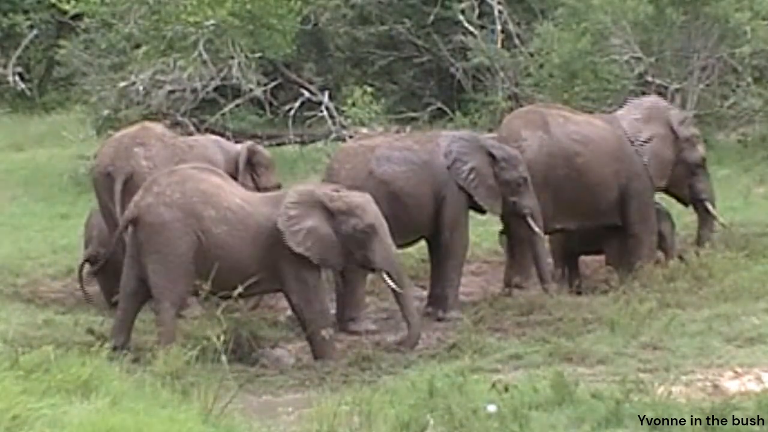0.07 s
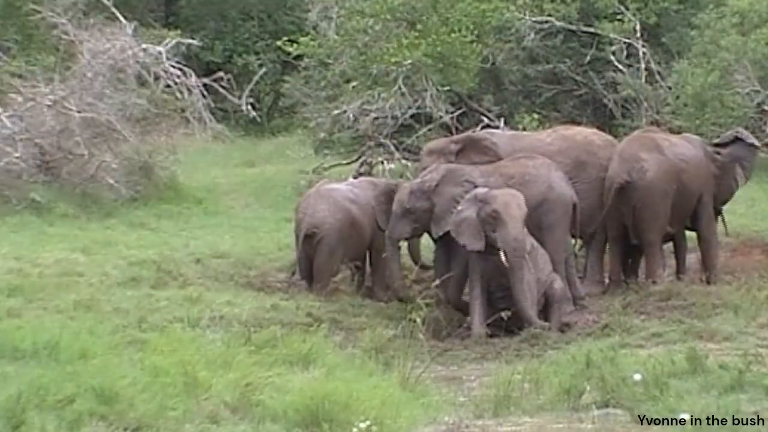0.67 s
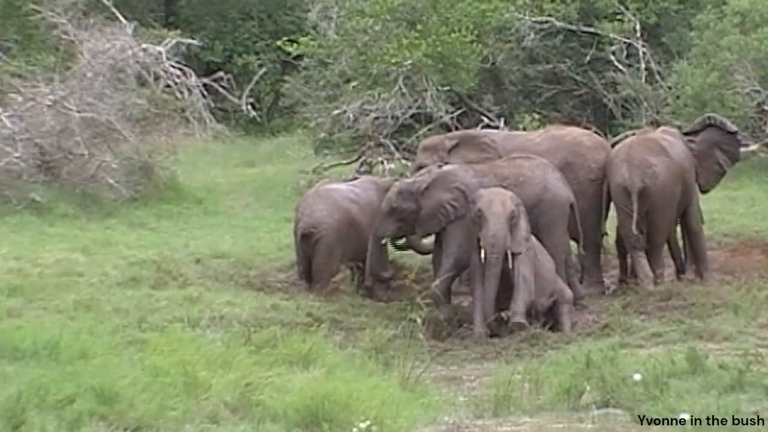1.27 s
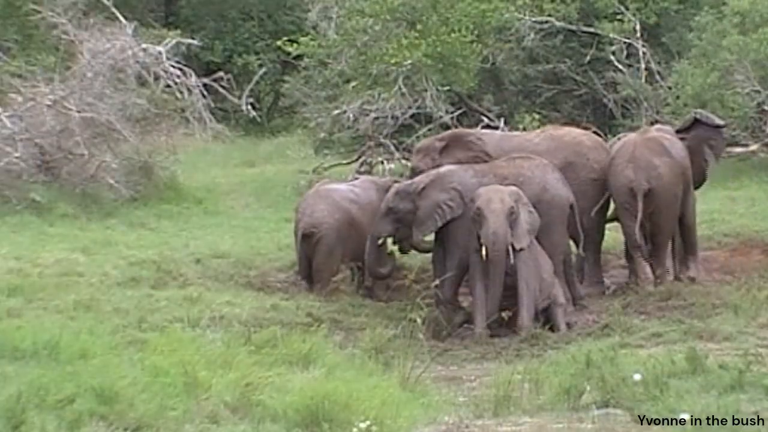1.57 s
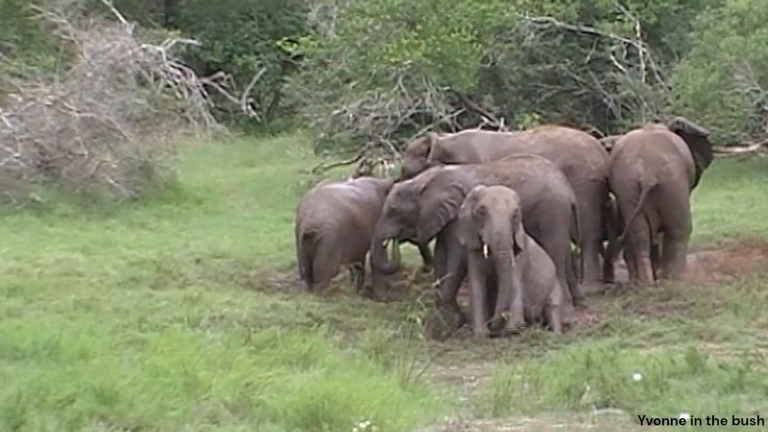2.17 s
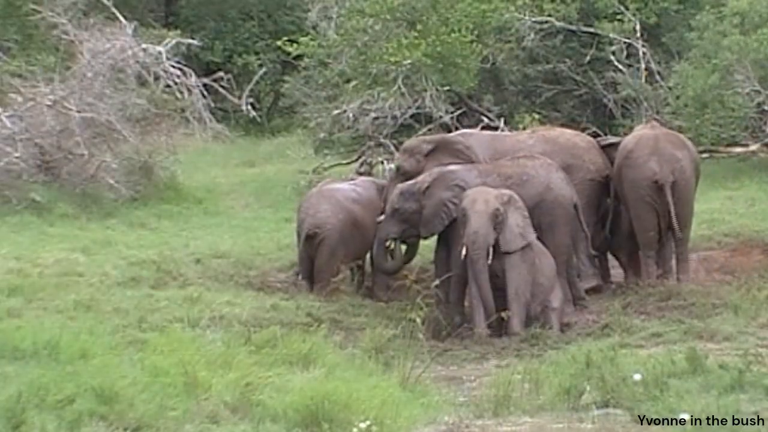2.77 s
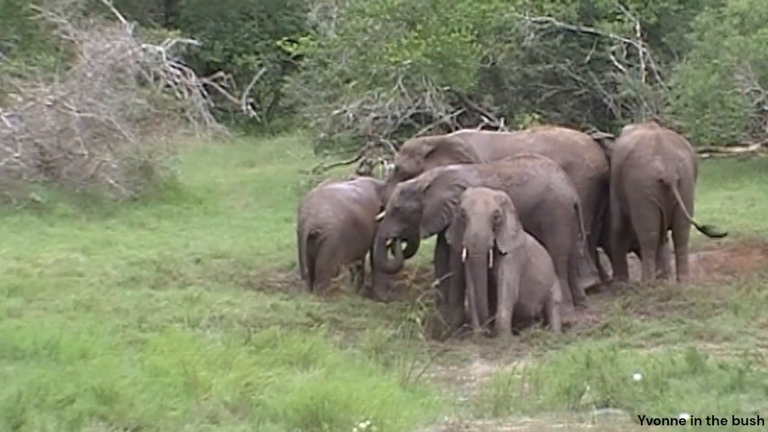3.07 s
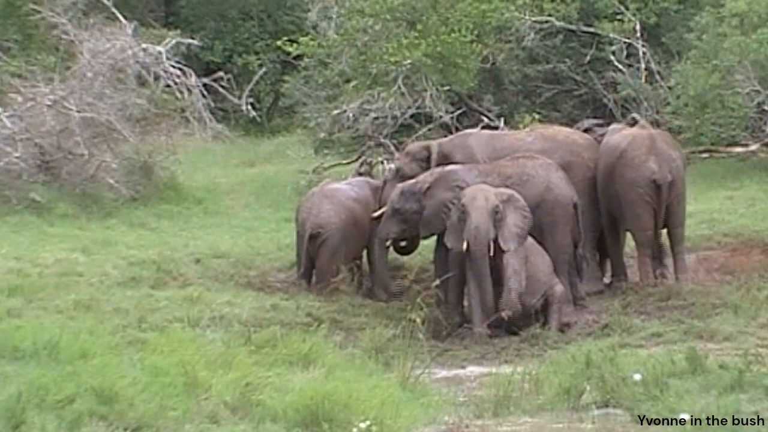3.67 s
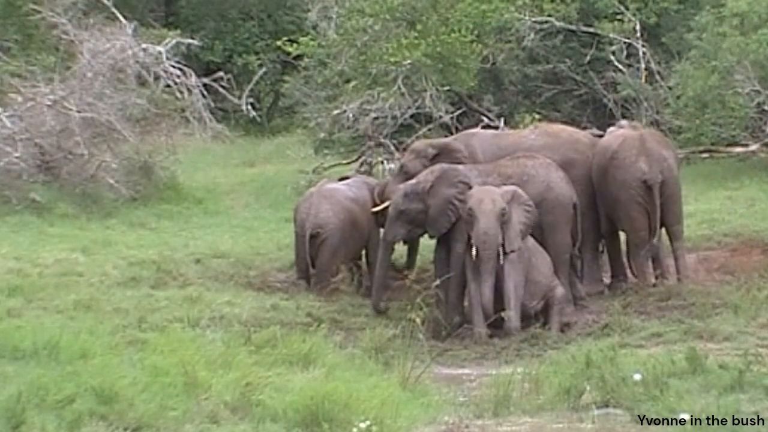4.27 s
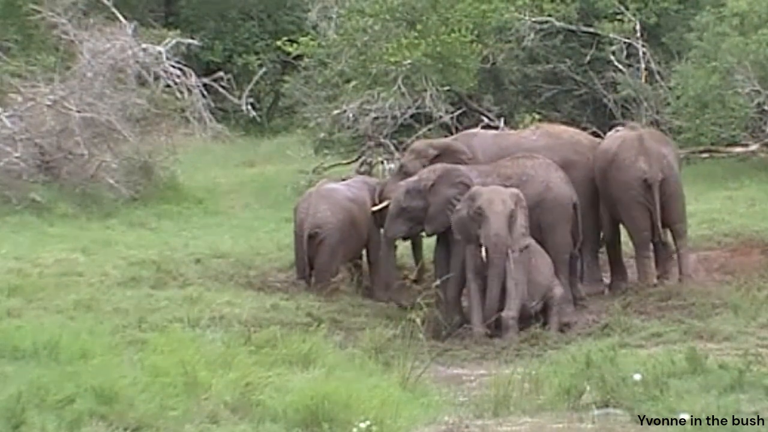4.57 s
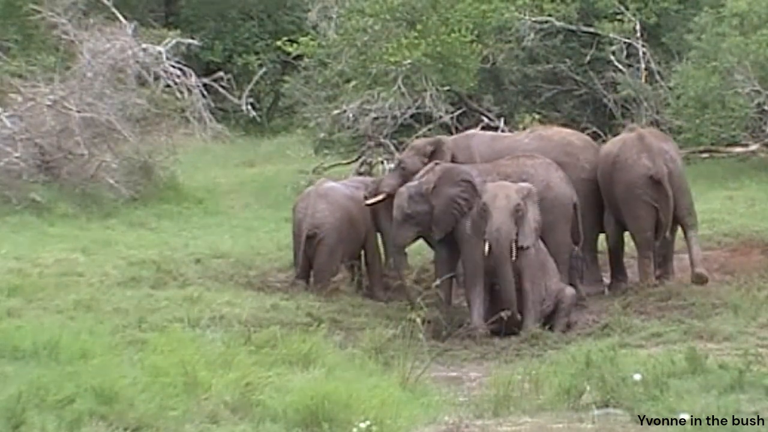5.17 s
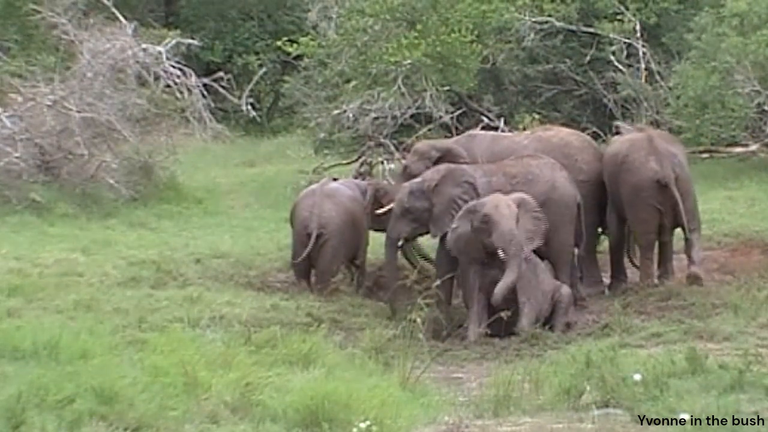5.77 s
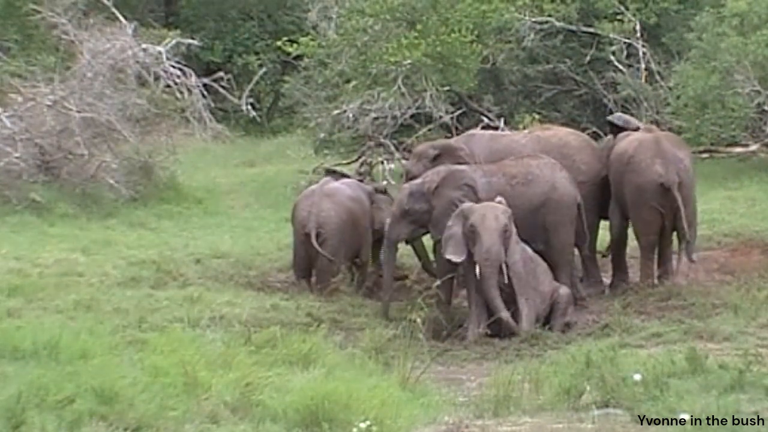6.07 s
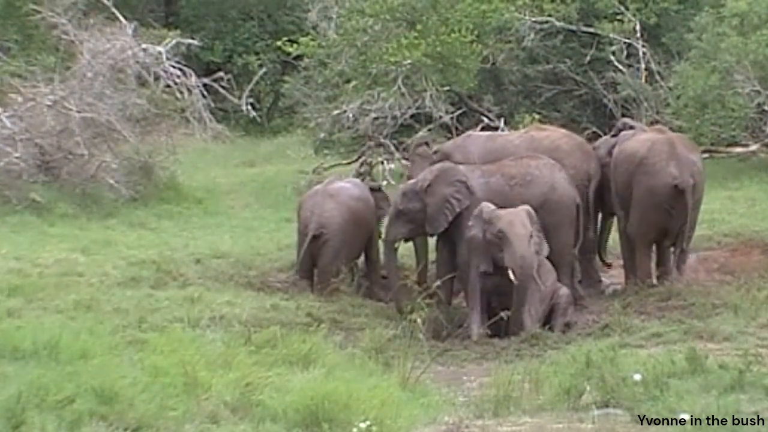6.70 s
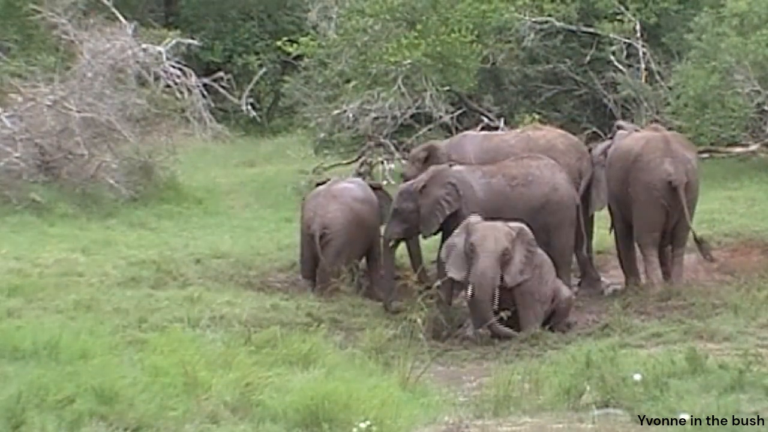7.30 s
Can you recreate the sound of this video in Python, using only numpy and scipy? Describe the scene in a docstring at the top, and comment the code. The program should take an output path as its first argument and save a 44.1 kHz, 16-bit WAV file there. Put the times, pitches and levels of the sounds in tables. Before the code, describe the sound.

Low gusts of wind buffet the microphone in open grassland, louder than anything else, over a faint, high shrilling of bush crickets. A small bird twitters early on. Some way off, elephants slop and gulp in a mud hole. Near the middle, flung mud patters down and a trunk blows out with a short, hollow, gurgling hiss. Soft squelches, bubbles and a few more chirps follow as the gusts return.

```python
"""Elephants wallow in a mud hole in open grassland, some way from a hand-held camera.
The mud slops and sucks in bursts of wet grains, with the rising ring of bursting air pockets. One trunk
flings a patter of drops and clods, then blows out in a hollow, gurgling hiss. A small bird twitters in
quick whistled arcs, bush crickets shrill with toothed wings, and gusts buffet the microphone."""
import sys
import numpy as np
from scipy import signal
from scipy.fft import rfft, irfft
from scipy.io import wavfile
from scipy.ndimage import uniform_filter1d

SR = 44100
rng = np.random.default_rng(int(sys.argv[2]) if len(sys.argv) > 2 else 0)


def persist_wave(psi):
    """Save psi, clipped to +-1, as 16-bit WAV."""
    counts = np.round(np.clip(psi, -1, 1) * 32767).astype(np.int16)
    wavfile.write(sys.argv[1], SR, np.atleast_2d(counts).T)


N = 332514
TIME = np.arange(N) / SR
FREQ = np.maximum(np.fft.rfftfreq(N, 1 / SR), 1)
STRIKE_HZ = 302.1  # tooth strikes of a bush cricket's wing per second

# The breeze at the microphone. Each row: time in seconds, level in dB.
BREEZE = [(0, -53), (.24, -55), (.32, -36), (.62, -30.5), (1.6, -25), (1.9, -32), (2.1, -34.5), (2.4, -27),
          (2.65, -33.5), (3.15, -46), (3.9, -47.5), (4.3, -30), (4.65, -46), (5.1, -43), (5.9, -33),
          (6.3, -27.5), (6.56, -33.5), (6.78, -24), (7.15, -33), (7.54, -33.5)]
# Gusts. Each row: centre in seconds, half length in seconds, level in dB, extra treble reach in octaves.
GUSTS = [(0.33, 0.02, -29, 0.21), (0.603, 0.025, -23, 0.17), (0.702, 0.05, -24, 0.4),
         (0.812, 0.042, -21.5, -0.026), (0.965, 0.014, -21, 0.6), (1.056, 0.085, -19.5, 0.34),
         (1.275, 0.045, -24, 1.25), (1.355, 0.026, -20, 2.26), (1.635, 0.058, -29, 0.54),
         (1.762, 0.025, -22.5, -0.044), (2.188, 0.044, -28, -0.26), (2.385, 0.041, -22.5, -0.42),
         (2.856, 0.083, -19.5, -0.13), (3.355, 0.053, -28.5, -0.31), (4.09, 0.054, -27.5, 0.12),
         (4.208, 0.02, -19.5, 0.52), (4.33, 0.2, -36, -1.1), (5.21, 0.036, -28.5, 0.05),
         (5.478, 0.076, -28, -0.062), (5.691, 0.052, -20, 0.19), (6.007, 0.095, -19.5, 0.27),
         (6.079, 0.042, -18, 0.17), (6.242, 0.027, -25, 0.67), (6.351, 0.021, -26, 0.042),
         (6.964, 0.029, -28.5, .3), (7.046, 0.028, -26, 0.029), (7.42, 0.058, -25, -0.33)]
# Tone of the wind rumble. Each row: frequency in Hz, relative level in dB per half octave.
RUMBLE_TONE = [(20, -38), (40, -3), (62, 2), (100, 3), (150, -2), (200, -9.5), (280, -28.5), (400, -35),
               (600, -39), (1200, -78)]
# Single eddies. Each row: centre in seconds, pitch in Hz, peak in dB.
THUMPS = [(0.31, 106, -16), (0.611, 132, -15.5), (0.737, 108, -8.5), (0.812, 141, -13), (0.961, 202, -20),
          (1.057, 130, -14.5), (1.09, 196, -10.5), (1.251, 207, -9), (1.33, 160, -14), (1.346, 241, -7),
          (1.361, 440, -14), (1.653, 140, -9), (1.727, 143, -11), (4.194, 120, -12), (4.212, 176, -7.5),
          (4.977, 108, -22.5), (5.228, 141, -25), (5.991, 150.4, -15.5), (6.062, 189, -12.5),
          (6.092, 165, -14), (6.227, 149.7, -15.5), (6.496, 101, -14)]

# EQ curves. Each row: frequency in Hz, relative gain in dB.
AIR_EQ = [(30, 20.5), (100, 18), (220, 6), (500, 7), (800, 3.5), (1400, -2), (2300, -1), (4500, -8),
          (7000, -8.5), (8500, -3), (10000, -1), (13000, -21), (15500, -21)]  # open-air bed
WING_EQ = [(8000, -40), (10000, -22), (10500, -10), (10900, -10), (11190, -1), (11400, -4), (11800, -4),
           (12080, 2), (12450, -3), (12900, -4), (13300, -12), (13800, -8), (14600, -11), (15700, -25)]  # ring of a bush cricket's wing
CHORUS_EQ = [(8000, -44), (9900, -38), (10500, -9), (11300, -1.5), (12900, -2.5), (13300, -2), (13800, -7),
             (14600, -2.5), (15700, -34)]  # distant bush crickets
SLOP_EQ = [(200, 1), (600, -8.5), (850, -2), (1250, 3), (2100, -3), (3400, -2.5), (6000, -11.5),
           (11000, -8), (15500, -22)]  # slopping mud
SQUELCH_EQ = [(400, -4), (900, 7), (1900, 1.5), (2900, 4.5), (4500, -10), (7000, -18), (11000, -15),
              (15500, -37)]  # wet suction
DROP_EQ = [(290, -26), (500, -9), (863, -10), (982, -7.5), (1620, 7.5), (2430, -4.5), (3430, 2), (6270, -4),
           (11000, 2), (14000, -12), (15500, -40)]  # falling drops
CLOD_EQ = [(200, 0), (520, -5), (650, -4), (900, 0), (1250, -1), (2100, -6), (3400, -1.5), (6000, -7.5),
           (10500, -1), (13000, -9), (15500, -34)]  # landing clods
TRUNK_EQ = [(200, -10), (330, 5.5), (430, 3.5), (530, 10.5), (680, -10), (1200, 0), (2300, 0), (4500, -1),
            (7000, -6.5), (11000, 1.5), (13000, -1), (15500, -18)]  # air blown through a trunk

# Fader rides. Each row: time in seconds, level in dB.
BUZZ_FADER = [(0, -52), (.3, -48), (.8, -59.5), (1.3, -55), (2.5, -55), (3.85, -46.5), (4.5, -50.5),
              (4.9, -42), (5.7, -49), (6.2, -54), (6.7, -48), (7.1, -53)]  # the nearest bush cricket
BUBBLING_FADER = [(0, -65), (.2, -60), (.43, -55), (.46, -66), (.92, -64.5), (1.25, -53.5), (1.6, -56.5),
                  (2.2, -64), (2.6, -68), (3.3, -58), (4.2, -67), (4.6, -66.5), (5.05, -55), (5.25, -55),
                  (5.5, -67), (5.85, -62), (6.25, -61.5), (6.65, -56.5), (7.3, -58), (7.54, -60)]  # wet background: swells, drops abruptly at 0.44 s, then comes and goes
# Solo bush crickets. Each row: start in seconds, end in seconds, pitch in Hz, level in dB.
SHRILLS = [(.08, 0.35, 11170, -53.5), (.45, 1.2, 12670, -61), (.4, 1.9, 12050, -57), (1.3, 2.6, 12950, -67),
           (3.5, 5.9, 11070, -52.5), (3.6, 5.6, 12070, -57), (4.1, 4.2, 12500, -51), (6.1, 6.8, 13600, -58),
           (6.6, 9, 14500, -63), (.05, .5, 9750, -63), (6.6, 7.4, 10600, -57)]

# Mud hits. Each row: peak time in seconds, decay in seconds, level in dB, treble tilt in dB per octave,
SLOPS = [(1.773, 0.042, -45, -1, 944), (1.862, 0.032, -51, -11, 1670), (1.955, 0.052, -51.5, -21, 1170),
         (2.22, 0.02, -52, 2.5, 1470), (2.32, 0.054, -50, 3, None), (2.607, 0.002, -42.5, 5.5, None),
         (2.694, 0.033, -48.5, -5, 1590), (2.725, 0.03, -41, -3, None), (3.5, 0.095, -55.5, 2, None),
         (3.677, 0.0073, -48.5, -7, 1590), (3.972, 0.021, -48.5, -9, None), (4.01, 0.022, -54, -2, 1480),
         (4.05, 0.053, -45.5, -2.5, None), (4.155, 0.13, -47, 6, None), (4.255, 0.026, -56, -14, 1600),
         (5.008, 0.015, -43.5, -1.5, 1570), (5.613, .003, -52, 13, None), (5.8, 0.12, -55, -11, None),
         (6.54, 0.044, -49, -3, 1690), (6.6, 0.029, -45.5, -2, 1280), (6.65, 0.038, -56, -22, 1160),
         (6.722, 0.019, -56, -18, None), (6.77, 0.031, -61, -22, None), (6.875, .03, -58.5, -13, 1640),
         (7.04, 0.054, -58, -8, None), (7.28, 0.045, -55, -8, None)]  # feet and trunks in the wallow
SQUELCHES = [(2.918, 0.0024, -36.5, 4.7, 3520), (3.353, 0.0012, -42.5, 3.4, 3700),
             (3.79, 0.029, -47, 3.4, None), (3.835, 0.017, -39, 6, 2900), (3.889, 0.029, -41, 4.5, 2300)]  # sharp wet suction
CLODS = [(2.72, 0.0077, -35.5, -2.5, None), (2.732, 0.01, -39, -1.5, None),
         (2.768, 0.026, -41.5, 1.5, None), (2.828, 0.03, -44, 2, None), (2.856, .008, -50, 4, None),
         (2.896, 0.003, -39.5, -4.5, None), (2.94, 0.007, -54, 2, None), (2.983, 0.0028, -34, -3.5, None),
         (3.198, .003, -45, 1, None)]  # flung mud landing

# Bird syllables. Each row: start in seconds, shape name, length in seconds, pitch in Hz, level in dB.
SONG = [(0.442, "dip", 0.023, 2270, -40), (0.472, "dip", 0.033, 1980, -38.5),
        (0.515, "zip up", 0.012, 3000, -45), (0.524, "fall", 0.029, 2410, -37.5),
        (0.57, "rise", 0.031, 3150, -50), (0.619, "dip", 0.031, 2120, -40),
        (0.646, "rise", 0.043, 3600, -41.5), (0.791, "dip", 0.031, 2160, -48),
        (0.831, "hook", 0.026, 2970, -48.5), (0.885, "dip", 0.038, 2176, -47.5),
        (0.913, "hook", 0.043, 3360, -54), (0.993, "rise", 0.014, 2530, -51),
        (1.009, "fall", 0.026, 2090, -53), (1.065, "hook", 0.021, 3150, -49.5),
        (1.078, "fall", 0.036, 2460, -52), (1.197, "sag", 0.22, 2777, -53.5),
        (1.301, "arch", 0.047, 3010, -47.5), (1.437, "rise", 0.019, 2980, -50),
        (1.47, "rise", 0.05, 3930, -52.5), (6.708, "rise", 0.036, 4050, -56),
        (6.76, "rise", 0.038, 3500, -55), (6.867, "fall", 0.042, 3490, -52.5),
        (6.9, "arch", 0.044, 3620, -55), (7.422, "fall", .02, 3560, -53),
        (7.448, "fall", 0.026, 2760, -49.5), (7.493, "fall", 0.02, 2710, -49.5)]
# Syllable shapes. Each entry: name, then start, middle and end pitch as ratios of the syllable's pitch.
GLIDES = {"zip down": (1.5, 1, .72), "zip up": (.72, 1.1, 1.65), "dip": (1.42, 1, 1.6),
          "fall": (1.27, 1, .84), "rise": (.93, 1, 1.09), "sag": (1.12, 1.02, .86), "arch": (.85, 1, .68),
          "hook": (.84, 1.02, .96)}
# Bouts of the bird's paired zips. Each row: start in seconds, level in dB.
ZIP_BOUTS = [(0.718, -47.5), (4.703, -51)]

# Large bubbles. Each row: start in seconds, starting pitch in Hz, level in dB.
GLUGS = [(1.77, 1400, -40), (2.007, 1120, -46), (3.975, 1480, -45), (4.045, 1560, -39), (4.058, 1750, -44),
         (4.948, 1560, -43.5), (5.44, 1480, -45.5), (5.609, 1470, -48), (6.56, 1380, -44),
         (6.597, 940, -42.5), (6.645, 1270, -48), (6.711, 796, -41.5), (6.72, 1180, -37.5),
         (6.761, 1184, -42), (6.78, 1180, -41.5), (6.83, 1049, -50)]  # rising through the mud
BURPS = [(2.893, 378, -38), (2.98, 490, -30), (2.982, 328, -40), (3.17, 520, -46)]  # in the trunk as it blows


def undb(db):
    """Decibels to gain."""
    return 10 ** (np.asarray(db) / 20)


def unit(x):
    """Scale to an rms of one."""
    return x / np.sqrt(np.mean(x ** 2))


def curve(rows):
    """Join (seconds, value) rows by straight lines."""
    return np.interp(TIME, *np.transpose(rows))


def eq(points):
    """Gain at every frequency from (Hz, dB) points."""
    hz, db = np.transpose(points)
    return undb(np.interp(np.log(FREQ), np.log(hz), db))


def bell(centre_hz, width_hz):
    """Gain of a bell-shaped band-pass."""
    return np.exp(-((FREQ - centre_hz) / width_hz) ** 2 / 2)


def shape(x, gain):
    """Filter by a gain per frequency; rms one."""
    return unit(irfft(rfft(x) * gain, N))


def pan(db):
    """Stereo gains for a level difference; positive leans left."""
    return undb(np.array([[db], [-db]]) / 2)


def ports(x, radians):
    """A source off to one side reaches the two microphone ports out of phase."""
    return irfft(rfft(x) * np.exp(1j * np.array([[0], [radians]])), N)


def wander(rate_hz):
    """Smooth random modulation; rms one."""
    hold = max(int(SR / rate_hz), 1)
    steps = np.repeat(rng.standard_normal(N // hold + 1), hold)
    return unit(uniform_filter1d(uniform_filter1d(steps, hold), hold)[:N])


def stereo_noise(likeness):
    """Left and right noise, from fully wide (0) to mono (1)."""
    centre = np.sqrt(likeness) * rng.standard_normal(N)
    return centre + np.sqrt(1 - likeness) * rng.standard_normal((2, N))


def envelope(s, attack_s, hold_s, release_s):
    """Swell up to time s, hold, then die away."""
    age = TIME - s
    return np.exp(-(np.minimum(age, 0) / attack_s) ** 2 - np.maximum(age - hold_s, 0) / release_s)


def wind(calm_db=-32.5, db_per_octave=43.5, flutter_db=2.6, ceiling=.55, lowpass_hz=1400):
    """Turbulent rumble, opposite in sign at the two ports; stronger gusts shed smaller, higher eddies."""
    force, lift = undb(curve(BREEZE)) ** 2, 0
    for s, half_s, db, reach in GUSTS:
        gust = undb(db) ** 2 * np.exp(-2 * np.minimum(((TIME - s) / half_s) ** 2, 20))
        force, lift = force + gust, lift + reach * gust
    wind_db = 10 * np.log10(force)
    octaves = (wind_db - calm_db) / db_per_octave + lift / force
    stretch = np.maximum(1 + octaves / 3.8, .5)  # the spectrum stretches up from its low end
    turbulence = rfft(stereo_noise(.91) * np.array([[1], [-1]]))
    tone_hz, tone_db = np.transpose(RUMBLE_TONE)
    bands, power = 0, 0
    for hz in 20 * 2 ** (np.arange(13) / 2):
        band = unit(irfft(turbulence * np.maximum(1 - 2 * abs(np.log2(FREQ / hz)), 0), N))
        gain = undb(np.interp(np.log2(hz / 22) / stretch, np.log2(tone_hz / 22), tone_db))
        bands = bands + gain * band * pan(-1.4 * np.log2(hz / 50))  # small eddies lean right
        power = power + gain ** 2
    rumble = bands / np.sqrt(power)
    # compress, so that the flow, more than chance, sets how hard it hits
    rumble /= (uniform_filter1d(np.mean(rumble ** 2, axis=0), size=1500) + .1) ** (1 / 3)
    pressure = rumble * undb(wind_db + flutter_db * wander(45)) + thumps()
    rounded = ceiling * np.tanh(pressure / ceiling)
    return irfft(rfft(rounded) / (1 + (FREQ / lowpass_hz) ** 4), N)


def thumps(half_cycles=.62):
    """Each eddy gives one or two swings of pressure as it crosses the ports."""
    out = np.zeros(N)
    for (s, hz, db), phase in zip(THUMPS, rng.random(len(THUMPS))):
        span = abs(TIME - s) < .05
        cycles = (TIME[span] - s) * hz
        swing = np.cos(2 * np.pi * (cycles + phase))
        out[span] += undb(db) * np.exp(-(cycles / half_cycles) ** 2) * swing
    return out * np.array([[1], [-1]]) * pan(-4)


def air(db=-50, swell_db=2.75):
    """A bed of faint bush rustle and smooth hiss."""
    return shape(stereo_noise(.014), eq(AIR_EQ)) * undb(db + swell_db * wander(3.46)) * pan(3.3)


def near_bush_cricket(jitter=.0035, scatter_db=.5, second_s=.0013, second_db=-8):
    """Each tooth strike gives a short shrill ring of the wing, followed by a weaker one."""
    chance = rng.standard_normal((int(STRIKE_HZ * N / SR), 4)).T
    strikes = np.cumsum(1 + jitter * chance[0]) / STRIKE_HZ
    times = np.concatenate([strikes, strikes + second_s * (1 + .035 * chance[1])])
    sizes = undb(np.repeat([0, second_db], len(strikes)) - scatter_db * chance[2:].ravel())
    # band-limited clicks, placed between the samples
    taps = (times * SR).astype(int)[:, None] + np.arange(-8, 9)
    pulses = sizes[:, None] * np.sinc(taps - times[:, None] * SR)
    clicks = np.bincount((taps % N).ravel(), pulses.ravel(), N)
    ring = ports(shape(clicks, eq(WING_EQ)), radians=2.12)
    return ring * undb(curve(BUZZ_FADER) + .69 * wander(9.8)) * pan(1.8)


def chorus(db=-54, diffuse_db=-4):
    """Distant bush crickets strike at nearly the same rate and blend into a steady, banded shimmer."""
    comb = undb(5 * np.cos(2 * np.pi * FREQ / STRIKE_HZ))
    noise = ports(rng.standard_normal(N), radians=1.55) + undb(diffuse_db) * stereo_noise(0)
    return shape(noise, eq(CHORUS_EQ) * comb) * undb(db) * pan(3.2)


def shrills(width_hz=30, fade_s=.14, waver_db=1):
    """Single bush crickets hold thin, wavering notes over the chorus."""
    notes = 0
    for start, end, hz, db in SHRILLS:
        note = shape(rng.standard_normal(N), bell(hz, width_hz))
        notes = notes + note * undb(db) * envelope(start, fade_s, end - start, fade_s)
    return ports(notes * undb(waver_db * wander(9.6)), radians=2.4) * pan(1.5)


def cricket(db=-56, first_s=.19, every_s=.306, half_s=.055, between_db=-7):
    """A lower insect chirps about three times a second and rasps softly in between."""
    from_peak_s = ((TIME - first_s) / every_s + .5) % 1 * every_s - every_s / 2
    chirps = np.hypot(np.exp(-(from_peak_s / half_s) ** 2), undb(between_db))
    rasp = shape(stereo_noise(.75) * np.array([[1], [-1]]), bell(5950, 430))
    return rasp * chirps * undb(db)


def patter(per_s, spread_db, wash_db, likeness, smear_s=.0005):
    """Tiny wet impacts of very unequal size, each briefly smeared, over a smooth wash."""
    hits = (rng.random(N) < per_s / SR) * undb(spread_db * np.minimum(rng.exponential(size=N), 4))
    energy = signal.lfilter([1], [1, -np.exp(-1 / (smear_s * SR))], hits ** 2 + 1e-18)
    grains = unit(np.sqrt(energy) * stereo_noise(likeness))
    return unit(grains + undb(wash_db) * stereo_noise(likeness))


def add_pop(out, s, hz, cycles, gains, rise=.13):
    """Mix in one bursting air pocket: a short ring whose pitch climbs by the fraction `rise`."""
    start = int(s * SR)
    progress = TIME[:min(int(cycles / hz * SR), N - start)] * hz / cycles
    ring = np.sin(2 * np.pi * cycles * progress * (1 + rise / 2 * progress))
    out[:, start:start + len(ring)] += gains * ring * np.exp(-4 * progress) * (1 - np.exp(-25 * progress))


def bubbles(per_s, low_hz, high_hz, cycles, spread_db):
    """Many small air pockets burst at random."""
    out = np.zeros((2, N))
    for when, pitch, size, side in rng.random((int(per_s * N / SR), 4)):
        gains = undb(-spread_db * np.log(max(size, .04))) * pan(12 * (side - .5))
        add_pop(out, when * N / SR, low_hz * (high_hz / low_hz) ** pitch, cycles, gains)
    return unit(out)


def splats(rows, tone, grains, tilt_from_hz=1200, sharpest_s=.0012, slap_s=.1, pop_db=8):
    """Each splat is a burst of wet grains that swells and dies away; some pop an air pocket at the peak."""
    out, size = np.zeros((2, N)), 2 ** 15
    hz = np.maximum(np.fft.rfftfreq(size, 1 / SR), 1)
    body = np.interp(hz, FREQ, eq(tone))
    treble_octaves = np.log2(np.maximum(hz / tilt_from_hz, 1))
    for s, decay_s, db, tilt_db, pocket_hz in rows:
        start = int(np.clip(s * SR - size / 4, 0, N - size))
        span = slice(start, start + size)
        burst = unit(irfft(rfft(grains[:, span]) * body * undb(tilt_db * treble_octaves)))
        attack_s = np.hypot(sharpest_s, decay_s ** 2 / (decay_s + slap_s))  # short ones slap, long swell
        out[:, span] += burst * envelope(s, attack_s, 0, decay_s)[span] * undb(db)
        if pocket_hz:
            add_pop(out, s, pocket_hz, cycles=25, gains=undb(db + pop_db))
    return out


def wallow():
    """Feet and trunks slop in the mud and pull free; a wet, bubbling background comes and goes."""
    grains = patter(per_s=1200, spread_db=3.5, wash_db=-2, likeness=.55)
    pockets = bubbles(per_s=380, low_hz=968, high_hz=2140, cycles=24, spread_db=3)
    slops = splats(SLOPS, SLOP_EQ, grains + undb(-34.5) * pockets) * pan(5)
    suction = patter(per_s=2000, spread_db=3, wash_db=-1, likeness=.05)
    squelches = splats(SQUELCHES, SQUELCH_EQ, suction) * pan(.7)
    seethe = bubbles(per_s=600, low_hz=940, high_hz=1824, cycles=34, spread_db=2)
    bubbling = unit(shape(grains, eq(SLOP_EQ)) + undb(-7.5) * seethe)
    return slops + squelches + bubbling * undb(curve(BUBBLING_FADER)) * pan(2.7)


def zips(pairs=4, every_s=.266, answer_s=.061, length_s=.016, hz=3150):
    """The bird's bouts as syllable rows: each falling zip is answered by a rising one."""
    return [(s + k * every_s + lag, kind, length_s, hz, db)
            for s, db in ZIP_BOUTS for k in range(pairs)
            for kind, lag in (("zip down", 0), ("zip up", answer_s))]


def bird(swell_db=4, flutter_db=1, leaves_hz=4900, scatter_db=-8, scatter_s=.036):
    """Quick whistled arcs, dulled and blurred by the bushes."""
    song, wobble = np.zeros(N), 1 + .008 * wander(600)
    for s, kind, length_s, pitch_hz, db in SONG + zips():
        span = (TIME >= s) & (TIME < s + length_s)
        progress = np.clip((TIME[span] - s) / length_s, 0, 1)
        glide = np.polyval(np.polyfit([0, .5, 1], GLIDES[kind], 2), progress)
        hz = pitch_hz * glide * wobble[span]
        gain = undb(db + swell_db * (progress - 1) * (kind == "dip"))  # a dip grows louder as it goes
        fade = np.minimum(2 * abs(np.sin(np.pi * progress)), 1)
        song[span] += gain * fade * np.sin(2 * np.pi * np.cumsum(hz) / SR)
    song *= undb(flutter_db * wander(250))
    dulled = irfft(rfft(song) / (1 + (FREQ / leaves_hz) ** 10), N)
    bushes = unit(stereo_noise(0) * np.exp(-TIME / scatter_s)) / np.sqrt(N)
    echo = signal.fftconvolve(dulled[None], bushes[:, :SR // 2], axes=1)[:, :N]
    return (ports(dulled, radians=1.71) + undb(scatter_db) * echo) * pan(5.2)


def glugs(rough_db=2):
    """Large air pockets gulp at the surface; the wall of mud around them roughens the ring."""
    out = np.zeros((2, N))
    for s, hz, db in GLUGS:
        add_pop(out, s, hz, cycles=30, gains=undb(db), rise=.28)
    return out * undb(rough_db * wander(500)) * pan(7.5)


def flung_mud(s=2.755, attack_s=.046, drip_db=-67):
    """Drops and clods land in a burst and run off slowly; the wet animals drip all along."""
    drops = shape(patter(per_s=600, spread_db=3.4, wash_db=-5, likeness=.55), eq(DROP_EQ))
    landing = undb(-45) * envelope(s, attack_s, hold_s=.15, release_s=.059)
    runoff = undb(-57.5) * envelope(s, attack_s, hold_s=.65, release_s=.1)
    drops *= np.hypot(landing, runoff + undb(drip_db)) * undb(2 * wander(70)) * pan(.8)
    grains = patter(per_s=2500, spread_db=3, wash_db=-1, likeness=.6)
    return drops + splats(CLODS, CLOD_EQ, grains) * pan(2.5)


def trunk_blow(s=2.998, attack_s=.15, hiss_db=-40.5, gurgle_db=-53):
    """The trunk blows itself clear: a hollow hiss, a shorter gurgle and a few wet burps."""
    hiss = shape(stereo_noise(.028), eq(TRUNK_EQ)) * pan(1) * undb(hiss_db + wander(53))
    gurgle = ports(shape(rng.standard_normal(N), bell(515, 65)), radians=.31)
    gurgle *= undb(gurgle_db + 3.6 * wander(29.3))
    out = hiss * envelope(s, attack_s, hold_s=.058, release_s=.15)
    out += gurgle * envelope(s, attack_s, hold_s=.084, release_s=.045)
    for burp_s, hz, db in BURPS:
        add_pop(out, burp_s, hz, cycles=13, gains=undb(db))
    return out


def scene():
    """The elephants and the bird over a bed of wind and insects."""
    bed = wind() + air() + near_bush_cricket() + chorus() + shrills() + cricket()
    elephants = wallow() + glugs() + flung_mud() + trunk_blow()
    return bed + elephants + bird()


def record(dry):
    """The camera cuts the top end steeply."""
    top_hz = 15600
    return signal.sosfilt(signal.ellip(10, .1, 80, top_hz, fs=SR, output="sos"), dry)


dry = scene()
out = record(dry)
persist_wave(out)
```